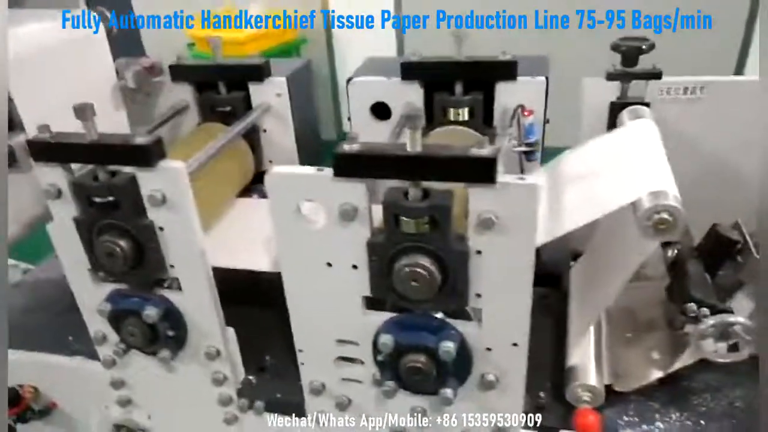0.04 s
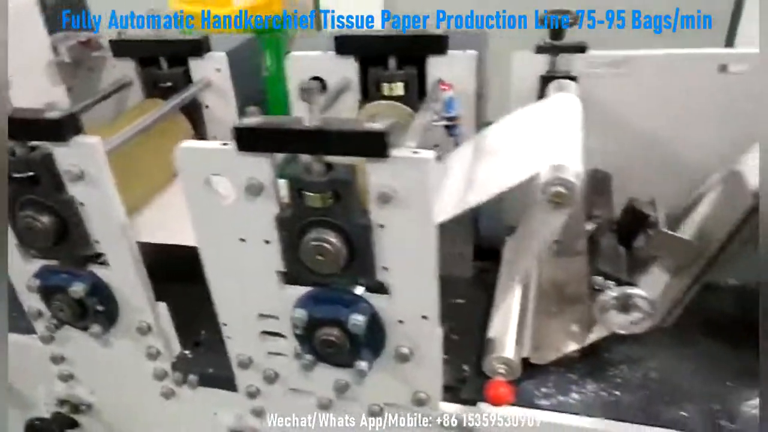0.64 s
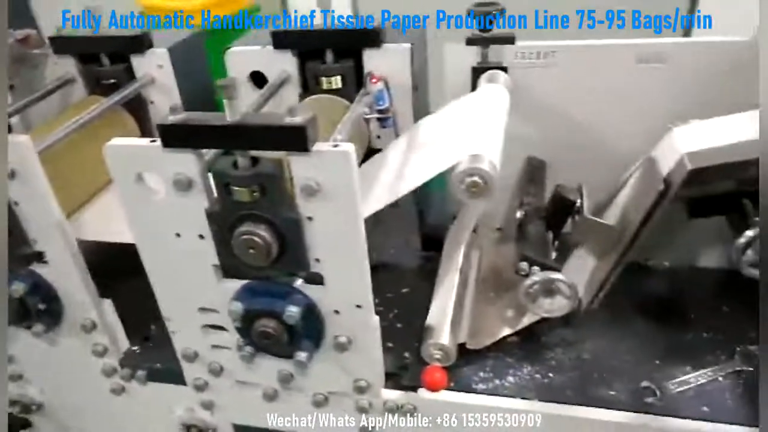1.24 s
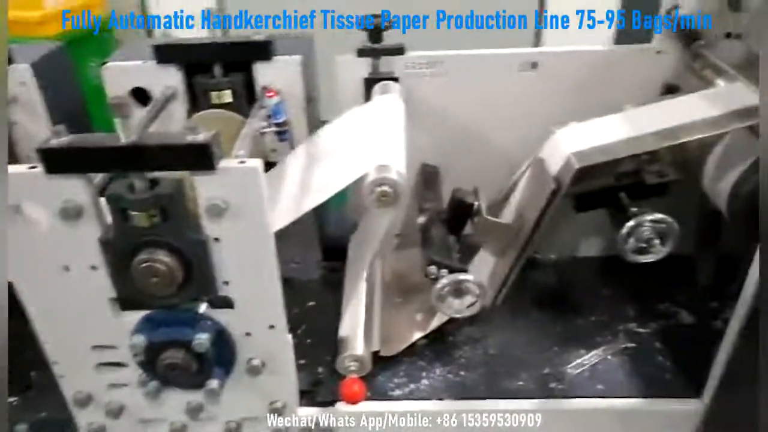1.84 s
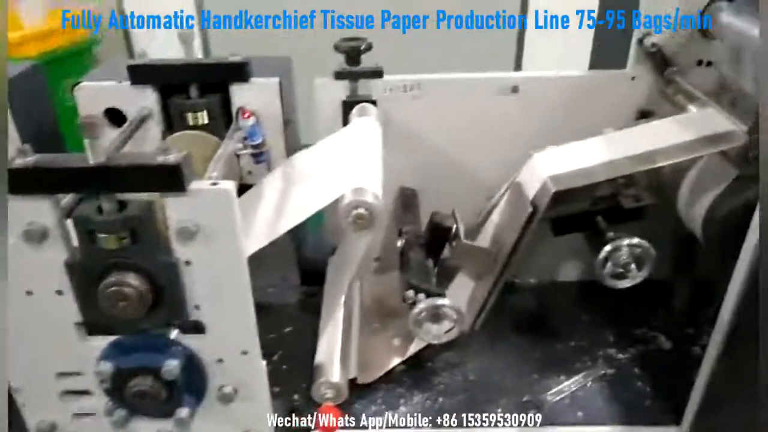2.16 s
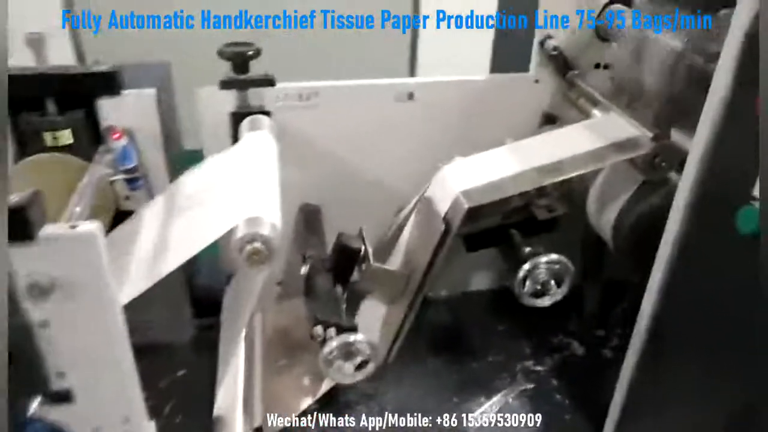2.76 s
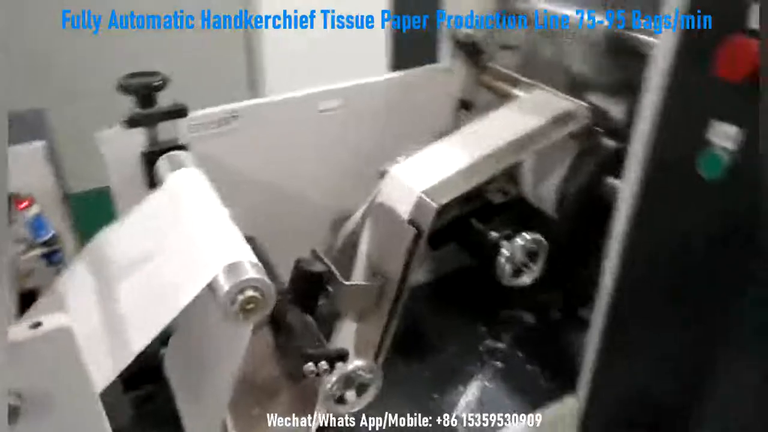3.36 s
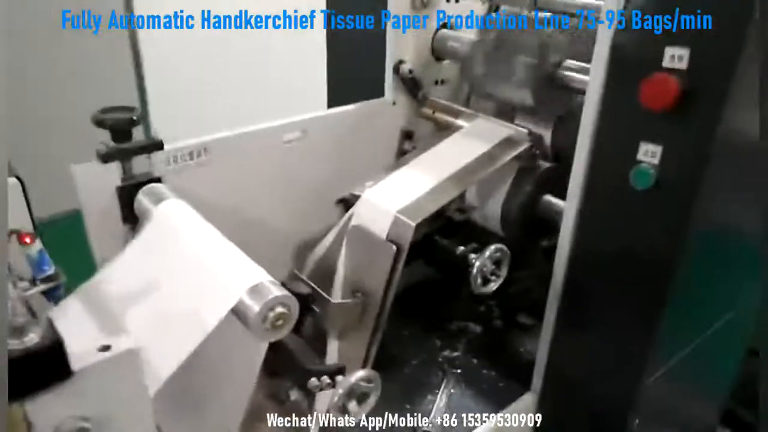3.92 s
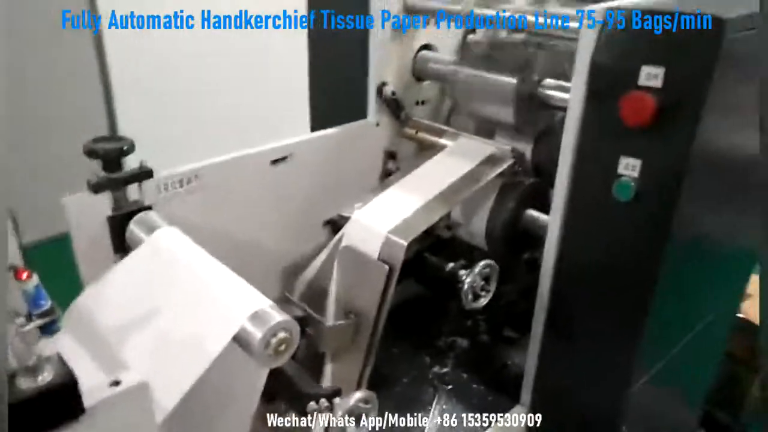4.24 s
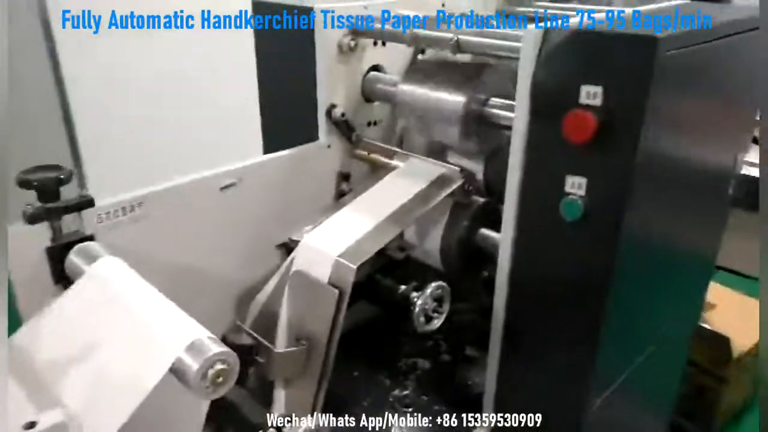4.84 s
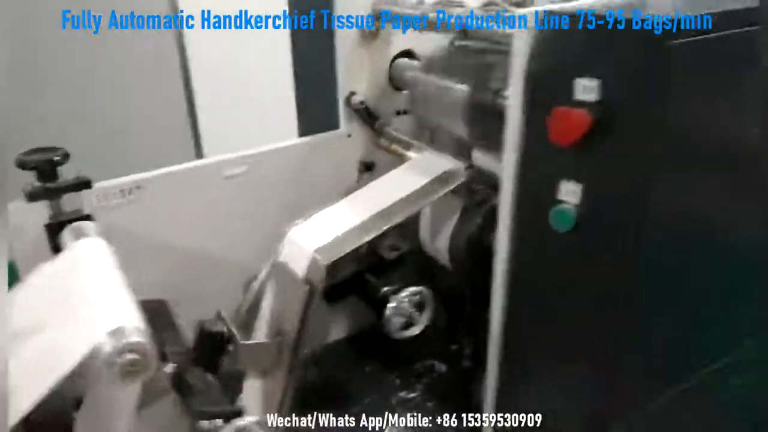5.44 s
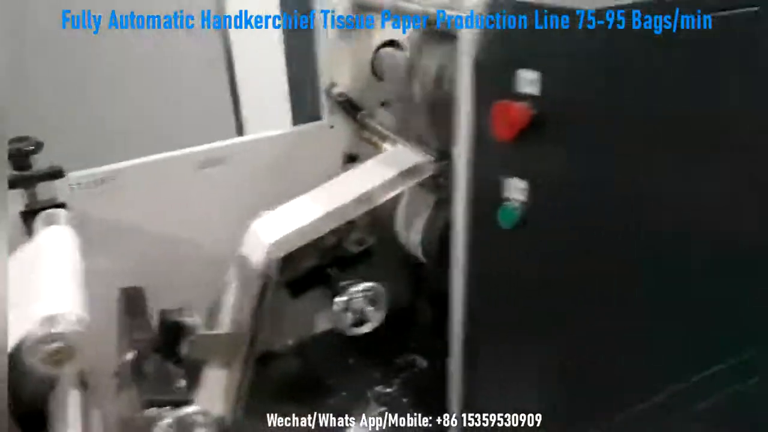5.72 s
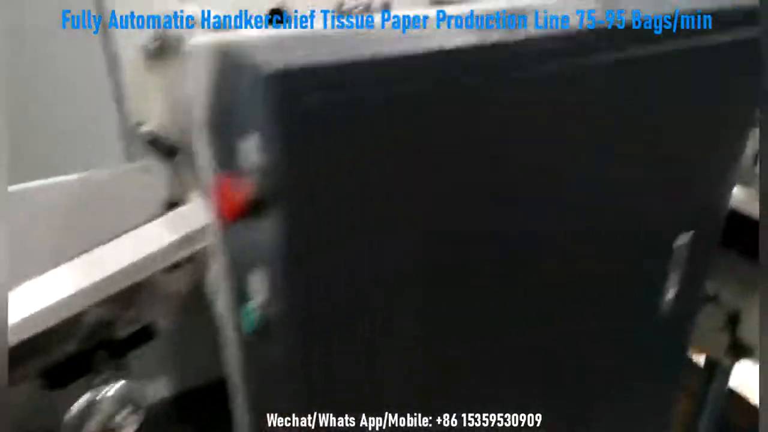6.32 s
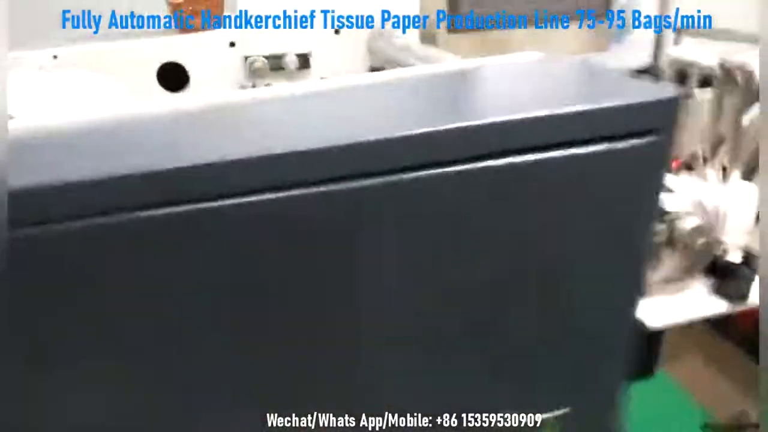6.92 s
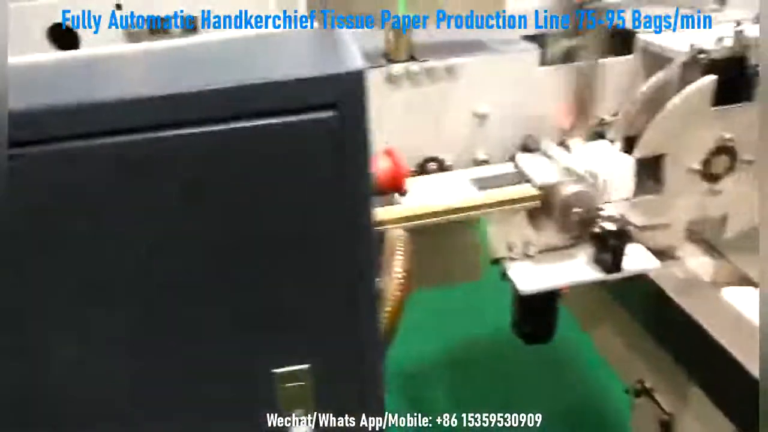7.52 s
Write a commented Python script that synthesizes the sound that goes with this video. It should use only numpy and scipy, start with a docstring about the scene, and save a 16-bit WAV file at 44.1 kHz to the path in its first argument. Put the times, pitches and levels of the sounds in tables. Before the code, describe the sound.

Steady factory drone with a fast clattering cutter, irregular booming knocks, paper swishing over rollers and regular puffs of air.

```python
"""A factory hall, on a phone microphone carried along the side of a pocket-tissue line.
From the start the hall roars, the paper web rushes, the drive whines and the cutter clatters 8.5 times
a second, keeping the frame humming; a sheet panel booms in uneven knocks and loose links clack.
The packer joins with soft thuds, then a puff of air about every seventh stroke; paper swishes over the
folding plate. From 1.5 s a roller scrapes now and then, and at 3.7 s the paper gives one thin squeal."""
import sys
import numpy as np
from scipy import signal
from scipy.fft import rfft, irfft
from scipy.io import wavfile
from scipy.ndimage import uniform_filter1d

SR = 44100
rng = np.random.default_rng(int(sys.argv[2]) if len(sys.argv) > 2 else 0)


def pcm_store(signal):
    """Save signal as 16-bit PCM."""
    levels = np.round(np.clip(np.atleast_2d(signal), -1, 1) * 32767)
    wavfile.write(sys.argv[1], SR, levels.astype(np.int16).T)


N = 334278
TIME = np.arange(N) / SR
STROKE_HZ, FIRST_STROKE_S = 8.531, .003
PACKER_CYCLE_S = 7 / STROKE_HZ

# Table levels are relative; an event's t is its peak and its length is its width at half height.
# likeness of the hall's field in the left and right channels: f/Hz, correlation
CHANNEL_LIKENESS = [(60, .98), (150, .91), (280, .86), (460, .8), (850, .55), (1200, .08), (1600, -.2),
                    (2250, .2), (3400, -.18), (4200, 0)]
# spectrum of the hall's roar: f/Hz, level/dB
HALL_SPECTRUM = [(25, -27), (40, -15.5), (60, -7.5), (110, -6), (160, -1), (205, -5), (260, 3), (310, -3),
                 (370, -1), (600, -3.5), (1000, -6.5), (1500, -7.5), (2200, -18.5), (4000, -41.5)]
# spectrum of paper rushing over the rollers: f/Hz, level/dB
RUSH_SPECTRUM = [(900, -23), (1500, -6), (1900, 0.5), (2350, 1), (2700, -5.5), (3100, -14), (4500, -39)]
# spectrum of paper hissing on the folding plate: f/Hz, level/dB
HISS_SPECTRUM = [(2000, -17), (3000, 2), (3800, 2.5), (4400, -2), (5000, -4.5), (6100, -5.5), (7500, -16)]
# that hiss at the microphone on its way along the machine: t/s, level/dB
HISS_LEVELS = [(0, -55), (1.1, -54.5), (1.4, -55.2), (2.25, -56), (2.8, -54), (3.1, -54.5), (3.6, -52.5),
               (4.15, -55), (4.6, -53.5), (5.3, -54), (6.3, -54), (7.58, -52.5)]
# motor and gear tones: f/Hz, level/dB
DRIVE_TONES = [(156.1, -65), (243, -48.5), (251.4, -52.5), (275.2, -48.5), (549, -58), (684, -62),
               (2001, -64.5), (6482, -82)]
# the groan at the microphone on its way along the machine: t/s, level/dB
GROAN_LEVELS = [(0, -63), (1, -54.5), (2.8, -57), (4.2, -55), (5, -63), (7.58, -61.5)]
# spectrum of the cutter's clatter: f/Hz, level/dB
CLATTER_SPECTRUM = [(150, -25.5), (280, 2), (430, -0.5), (700, -6.5), (1100, -10), (2200, -14), (4000, -24),
                    (7500, -29)]
# hum of the frame: multiple of the stroke rate, level/dB
FRAME_HARMONICS = [(15, -67), (17, -54.5), (20, -57), (21, -62), (22, -50.5), (25, -62), (26, -59.5),
                   (30, -52), (31, -54.5), (32, -56), (33, -61.5), (36, -49), (37, -60.5), (38, -52.5),
                   (56, -63.5), (59, -68.5)]
# loud knocks of the panel: t/s, level/dB, length/s, f/Hz
PANEL_KNOCKS = [(.005, -28.5, 0.0067, 290), (.024, -22, 0.0067, 302), (.048, -27.5, .022, 296),
                (.084, -25.5, 0.012, 296), (.118, -30, 0.017, 290), (.204, -26.5, 0.01, 289),
                (.254, -33, 0.023, 253), (.497, -23, 0.016, 277), (.553, -33, 0.017, 282),
                (.593, -35, 0.019, 274), (.964, -30.5, 0.023, 268), (1.053, -25, 0.015, 271),
                (1.525, -25.5, 0.02, 255), (1.883, -39, 0.016, 307), (1.995, -29, 0.023, 253),
                (2.226, -26, 0.024, 264), (2.335, -23, 0.012, 280), (2.348, -23, 0.013, 280),
                (2.571, -30, 0.012, 268), (2.605, -31, 0.0071, 264), (2.697, -20.5, 0.013, 278),
                (2.784, -23, 0.0088, 292), (2.811, -31, .02, 293), (2.934, -33, 0.015, 262),
                (3.403, -30.5, 0.016, 258), (3.835, -27, 0.011, 265), (3.849, -32, .008, 270),
                (3.874, -21, .02, 272), (3.992, -37, 0.019, 302), (4.108, -26, 0.028, 282),
                (4.306, -27.5, .012, 274), (4.338, -22, .018, 282), (4.56, -28, 0.01, 254),
                (4.718, -22, 0.015, 258), (4.777, -28.5, 0.01, 278), (4.807, -32, .016, 274),
                (4.965, -22.5, 0.012, 282), (5.045, -27.5, 0.0072, 288), (5.277, -30.5, 0.012, 282),
                (5.42, -28, .012, 272), (5.436, -18, 0.013, 283), (5.478, -37, 0.038, 276),
                (5.635, -30.5, .01, 282), (5.651, -28.5, 0.014, 280), (5.667, -26.5, .012, 280),
                (5.724, -27, 0.0123, 275), (5.743, -22, 0.011, 277), (5.866, -30, 0.016, 280),
                (5.945, -24, 0.014, 278), (6.069, -34, 0.02, 300), (6.106, -30, 0.013, 281),
                (6.138, -19.5, 0.007, 276), (6.355, -20, 0.013, 270), (6.445, -23.5, 0.013, 279),
                (6.545, -29, 0.014, 290), (6.576, -22, 0.007, 302), (6.607, -27.5, .008, 298),
                (6.67, -30.5, 0.0085, 272), (6.685, -34, .01, 287), (6.826, -20.5, 0.012, 282),
                (6.879, -37, 0.015, 274), (6.904, -26, 0.017, 270), (6.921, -20.5, 0.015, 278),
                (7.017, -28.5, 0.02, 280), (7.168, -38, 0.012, 262), (7.263, -20.5, .011, 283),
                (7.294, -24.5, 0.0051, 268), (7.392, -31.5, 0.0091, 272)]
# clacks of the linkage: t/s, level/dB, length/s
LINKAGE_CLACKS = [(0.017, -45, 0.044), (0.205, -45, .04), (1.182, -43, 0.05), (3.535, -44, .035),
                  (4.1, -43.5, 0.036), (4.33, -43.5, 0.044), (6.205, -46.5, .035)]
# resonances of the linkage: f/Hz, width/Hz, level/dB
LINKAGE_MODES = [(1220, 160, -6), (1420, 190, 0), (1650, 81, -1)]
# thuds of the packer: t/s, level/dB, length/s, f/Hz
PACKER_THUDS = [(.24, -40, .05, 165), (.31, -50, .06, 98), (1.16, -53, .08, 62), (1.27, -49, 0.079, 85.6),
                (1.42, -50, 0.091, 62), (1.84, -37.5, 0.046, 154), (1.94, -48, 0.071, 92),
                (2.7, -40.5, 0.062, 167), (2.77, -47, .06, 100), (3.05, -43, 0.048, 151),
                (3.52, -40, .04, 166), (4.31, -45.5, 0.054, 105), (4.41, -47.5, 0.053, 89.5),
                (5.22, -46, 0.063, 78.5), (6.07, -46.5, 0.069, 95), (6.36, -44.5, 0.036, 149),
                (6.8, -44, 0.046, 171), (6.86, -46, 0.054, 100), (6.92, -39, 0.036, 158),
                (7.05, -44.5, 0.037, 90), (7.3, -40.5, 0.086, 149.5)]
# puffs of the air valve: t/s, level/dB, time to fade by half/s
VALVE_PUFFS = [(.85, -50.5, .05), (1.68, -53, .05), (2.495, -48, 0.087), (3.32, -55.5, .04),
               (4.13, -49.5, .022), (4.947, -49, 0.048), (5.775, -51.5, .045), (6.585, -51.5, .04),
               (7.41, -49.5, 0.033)]
# spectrum of the escaping air: f/Hz, level/dB
AIR_SPECTRUM = [(2500, -28.5), (4000, -11.5), (5300, -4.5), (6100, 6.5), (7500, -1.5)]
# swishes of paper over the folding plate: t/s, level/dB, length/s, centre f/Hz
PAPER_SWISHES = [(.875, -48.5, 0.13, 3500), (1.033, -56, .13, 4830), (2.563, -52, 0.15, 3900),
                 (2.807, -52, 0.22, 3560), (3.372, -55, 0.067, 4600), (3.46, -50, .12, 3720),
                 (3.664, -61, 0.13, 5500), (4.404, -52, 0.15, 3560), (5.813, -50, 0.11, 3300),
                 (5.986, -51, 0.1, 3930), (6.596, -52.5, .08, 4000), (6.762, -54, 0.31, 3370),
                 (7.416, -48, 0.1, 3930)]
# higher grumbles of the panel: t/s, level/dB, length/s, f/Hz
PANEL_GRUMBLES = [(1.5, -39.5, .03, 400), (1.99, -37, 0.022, 390), (2.07, -37, 0.04, 335),
                  (2.105, -36, 0.03, 392), (2.345, -35.5, 0.029, 385), (2.8, -41, .05, 400),
                  (3.965, -37, 0.037, 432), (4.965, -35.5, .03, 387), (5.435, -40, 0.021, 394),
                  (5.74, -39, 0.03, 380)]
# scrapes of the roller: t/s, level/dB, length/s
ROLLER_SCRAPES = [(1.52, -50, .14), (2.472, -39.5, 0.065), (2.62, -49, .12), (3.41, -45, 0.1),
                  (3.52, -47, 0.05), (4.326, -42, .06), (4.41, -41, 0.067), (5.01, -46, .1),
                  (6.19, -42, .09), (6.77, -48, 0.09), (7.12, -40.5, 0.062)]
# resonances of the roller: f/Hz, width/Hz, level/dB
ROLLER_MODES = [(1650, 220, -4), (2018, 69, 1.5), (2290, 310, 1.5), (2640, 150, -5.5), (4050, 250, -13)]
# squeal of paper on the folding plate: t/s, level/dB, length/s, left minus right/dB
PAPER_SQUEALS = [(3.7, -52.5, 0.22, 2)]


def undb(db):
    """Decibels to gain."""
    return 10 ** (np.asarray(db) / 20)


def unit(x):
    """Scale to rms 1."""
    return x / np.sqrt(np.mean(x ** 2))


def wander(rate):
    """A smooth random curve at rms 1, changing about rate times a second."""
    steps = rng.standard_normal(int(rate * N / SR * 1.5) + 2)
    smooth = signal.resample(steps, 8192)
    return unit(np.interp(np.linspace(0, 8191, N), np.arange(8192), smooth))


def swell(t, length):
    """A bell curve round t = 0, length wide at half height."""
    return 2 ** -np.minimum((2 * t / length) ** 2, 60)


def pan(db):
    """Channel gains for a source db louder on the microphone's left."""
    return undb(np.array([[db], [-db]]) / 2)


def phase_shift(spread_rad):
    """A tone's phase shifts between left and right as the microphone moves through standing waves."""
    return spread_rad * np.array([[1], [-1]]) * wander(1)


def over_bins(points):
    """Read (f/Hz, value) points at every frequency bin, on a log axis."""
    hz, value = np.transpose(points)
    return np.interp(np.log(np.fft.rfftfreq(N, 1 / SR) + 1), np.log(hz), value)


def diffuse(pair, spectrum):
    """Two unrelated signals become a hall's field of this spectrum, most alike in the bass; rms 1."""
    alike = over_bins(CHANNEL_LIKENESS)
    mid, side = rfft(pair) * np.sqrt([1 + alike, 1 - alike])
    left_right = np.array([mid + side, mid - side])
    return unit(irfft(left_right * undb(over_bins(spectrum)), N))


def noise(spectrum):
    """Diffuse stereo noise of a given spectrum."""
    return diffuse(rng.standard_normal((2, N)), spectrum)


def ringing(modes):
    """Stereo noise ringing in resonances (f/Hz, width/Hz, level/dB)."""
    hz = np.fft.rfftfreq(N, 1 / SR)
    gain = sum(undb(db) / (1 + (2 * (hz - centre) / width) ** 2) for centre, width, db in modes)
    return unit(irfft(rfft(rng.standard_normal((2, N))) * gain, N))


def throbs(table):
    """Short tones that swell and fade, from rows (t/s, level/dB, length/s, f/Hz)."""
    out = np.zeros(N)
    for (s, db, length, hz), phase in zip(table, rng.random(len(table))):
        near = abs(TIME - s) < 2 * length
        t = TIME[near] - s
        out[near] += undb(db) * swell(t, length) * np.sin(2 * np.pi * (hz * t + phase))
    return out


def hall(db=-42, waver_db=.57):
    """The rest of the line blends into a steady roar all round the microphone."""
    return undb(db + waver_db * wander(11)) * pan(-.5) * noise(HALL_SPECTRUM)


def paper_web(rush_db=-46.5, rush_flutter_db=.9, hiss_gain_db=2, hiss_flutter_db=1.6, pull_db=1):
    """Fluttering paper rushes over the rollers; its hiss on the plate swells as the packer pulls."""
    pull = np.cos(2 * np.pi * (TIME - .2) / PACKER_CYCLE_S)  # hardest 0.2 s into each cycle
    hiss_db = hiss_gain_db + np.interp(TIME, *np.transpose(HISS_LEVELS))
    rush = undb(rush_db + rush_flutter_db * wander(24))
    hiss = undb(hiss_db + pull_db * pull + hiss_flutter_db * wander(24))
    return rush * pan(4.5) * noise(RUSH_SPECTRUM) + hiss * pan(2.5) * noise(HISS_SPECTRUM)


def drive(gain_db=-2, waver_db=2, drift=.0015):
    """Motors and gears sing at nearly steady speed; each tone swells and sinks along the machine."""
    out = 0
    for hz, db in DRIVE_TONES:
        angle = 2 * np.pi * np.cumsum(hz * (1 + drift * wander(8))) / SR
        out = out + undb(db + waver_db * wander(2)) * np.sin(angle + phase_shift(.2))
    return np.sqrt(2) * undb(gain_db) * out


def groan(hz=453, drift=.022, waver_db=3):
    """A wavering tone, loudest beside the embossing rollers, fades as the microphone moves on."""
    angle = 2 * np.pi * np.cumsum(hz * (1 + drift * wander(10))) / SR
    db = np.interp(TIME, *np.transpose(GROAN_LEVELS)) + waver_db * wander(6)
    return np.sqrt(2) * undb(db) * np.sin(angle + phase_shift(.3))


def cutter(db=-46, lead_s=.046, rise_s=.048, decay_s=.026, repeat_share=.3, scatter_db=2):
    """Each stroke sets off clatter that builds as the blade closes, partly the same every time."""
    strokes = (TIME - FIRST_STROKE_S + lead_s) * STROKE_HZ + 1
    age = strokes % 1 / STROKE_HZ
    repeated = rng.standard_normal((2, SR))[:, (age * SR).astype(int)]
    fresh = rng.standard_normal((2, N))
    rattle = np.sqrt(repeat_share) * repeated + np.sqrt(1 - repeat_share) * fresh
    force = undb(scatter_db * rng.uniform(-.88, 1, N))[strokes.astype(int)]
    burst = force * (1 - np.exp(-age / rise_s)) ** 2 * np.exp(-age / decay_s)
    return undb(db) * diffuse(rattle * burst, CLATTER_SPECTRUM)


def frame(gain_db=-2.5, waver_db=2, slip_rad=.56):
    """The frame hums on multiples of the stroke rate, all pushed together at each stroke."""
    angle = 2 * np.pi * STROKE_HZ * (TIME - FIRST_STROKE_S)
    hum = 0
    for multiple, db in FRAME_HARMONICS:
        level = undb(db + waver_db * wander(3.4))
        hum = hum + level * np.cos(multiple * angle + slip_rad * wander(3) + phase_shift(.081))
    return np.sqrt(2) * undb(gain_db) * hum


def soft_knocks(share=.45, db=-48.5, scatter_db=2, jitter_s=.023, length_s=.016, hz=275):
    """Some cutter strokes knock the panel softly: rows (t/s, level/dB, length/s, f/Hz)."""
    strokes = np.arange(FIRST_STROKE_S, N / SR, 1 / STROKE_HZ)
    jitter, force = rng.standard_normal((len(strokes), 2)).T
    struck = rng.random(len(strokes)) < share
    times = (strokes + jitter_s * jitter)[struck]
    levels = (db + scatter_db * force)[struck]
    return [(s, level, length_s, hz) for s, level in zip(times, levels)]


def panel(shaking, gain_db=-2.5, roughness=.05, skirt=.08, skirt_s=.059):
    """A sheet panel, shaken by the running machine, booms for a few cycles inside a longer rattle."""
    boom, motion = np.zeros((2, N)), np.zeros(N)
    shift = phase_shift(.1)
    for s, db, length, hz in list(PANEL_KNOCKS) + soft_knocks():
        near = abs(TIME - s) < 2 * skirt_s
        t = TIME[near] - s
        shape, angle = swell(t, length), 2 * np.pi * hz * t
        # the panel swings in step with whatever shakes it at that moment
        phase = np.angle(np.sum(shaking[:, near] * shape * np.exp(-1j * angle)))
        boom[:, near] += undb(db) * shape * np.cos(angle + phase + shift[:, near])
        motion[near] += undb(db) * (roughness * shape + skirt * swell(t, skirt_s))
    rattle = noise([(100, -34.5), (215, -14), (255, 3.5), (320, 3.5),  # f/Hz, level/dB
                    (380, -10), (500, -24), (1000, -48)])
    return undb(gain_db) * pan(-.5) * (boom + motion * rattle)


def linkage(gain_db=-1, chatter_db=2):
    """Loose links chatter together in light, hollow clacks."""
    contact = sum(undb(db) * swell(TIME - s, length) for s, db, length in LINKAGE_CLACKS)
    chatter = unit(undb(chatter_db * wander(120)))
    return undb(gain_db) * contact * chatter * ringing(LINKAGE_MODES)


def packer(gain_db=-1):
    """The packer grips, pushes and folds with soft, low thuds."""
    return undb(gain_db) * throbs(PACKER_THUDS)


def air_valve(rise_s=.02, rasp_db=1.5):
    """Left of the microphone a valve snaps open each packer cycle; its rasping hiss dies away."""
    flow = sum(undb(db) * swell(TIME - s, 2 * np.where(TIME < s, rise_s, fade_s))
               for s, db, fade_s in VALVE_PUFFS)
    rasp = unit(undb(rasp_db * wander(70)))
    return pan(9) * flow * rasp * noise(AIR_SPECTRUM)


def paper_swishes(width_octaves=.65):
    """The web slips over the folding plate: swells of hiss, each with its own brightness."""
    out = np.zeros((2, N))
    for s, db, length, hz in PAPER_SWISHES:
        near = abs(TIME - s) < 2 * length
        edges = hz * 2 ** (np.array([-.5, .5]) * width_octaves)
        band = signal.butter(2, edges, "bandpass", fs=SR, output="sos")
        hiss = signal.sosfilt(band, rng.standard_normal((2, N))[:, near])
        out[:, near] += undb(db) * swell(TIME[near] - s, length) * unit(hiss)
    return pan(3) * out


def panel_grumbles(gain_db=-1):
    """Now and then the panel also rings in a higher mode."""
    return undb(gain_db) * throbs(PANEL_GRUMBLES)


def roller_scrapes(gain_db=-1, chatter_db=.5):
    """Just left of centre, friction sticks and slips, ringing the metal roller."""
    grip = sum(undb(db) * swell(TIME - s, length) for s, db, length in ROLLER_SCRAPES)
    chatter = unit(undb(chatter_db * wander(60)))
    return undb(gain_db) * pan(2) * grip * chatter * ringing(ROLLER_MODES)


def paper_squeal(gain_db=-2, hz=4380, width_hz=110):
    """The paper rubs on the folding plate with a thin squeal."""
    drag = sum(undb(db) * pan(pan_db) * swell(TIME - s, length)
               for s, db, length, pan_db in PAPER_SQUEALS)
    return undb(gain_db) * drag * ringing([(hz, width_hz, 0)])


def flicker(pair, depth_db=2.5, size=1024):
    """Coarse grain: every narrow band swells and sinks within a few hundredths of a second."""
    cells = signal.stft(pair, nperseg=size)[2]
    chance = unit(uniform_filter1d(rng.standard_normal(cells.shape[1:]), size=3, axis=0))
    gain = unit(undb(depth_db * unit(np.tanh(chance))))
    return signal.istft(cells * gain, nperseg=size)[1][:, :N]


def standing_waves(pair, depth_db=2, above_hz=750, size=4096):
    """The hall's standing waves slowly lift and sink narrow bands as the microphone is carried along."""
    hz, _, cells = signal.stft(pair, SR, nperseg=size)
    chance = unit(uniform_filter1d(rng.standard_normal(cells.shape[1:]), size=17, axis=1))
    gain = np.where(hz[:, None] > above_hz, unit(undb(depth_db * chance)), 1)
    return signal.istft(cells * gain, nperseg=size)[1][:, :N]


def scene():
    """The whole line from alongside; the noisy parts share a coarse grain and the hall's colour."""
    noisy = hall() + cutter() + air_valve() + paper_web() + paper_swishes()
    noisy += roller_scrapes() + paper_squeal() + linkage()
    tonal = frame() + drive() + groan() + packer() + panel_grumbles()
    running = tonal + standing_waves(flicker(noisy))
    return running + panel(running)


def record(dry):
    """The phone cuts the treble steeply above 7.6 kHz."""
    return signal.sosfilt(signal.ellip(12, .1, 80, 7600, fs=SR, output="sos"), dry)


dry = scene()
out = record(dry)
pcm_store(out)
```